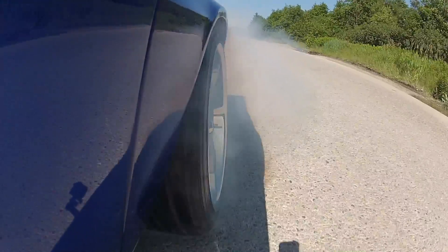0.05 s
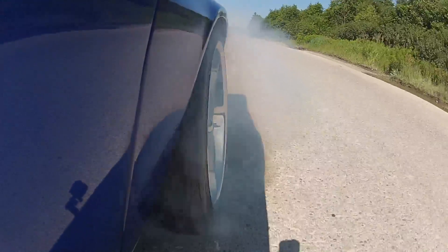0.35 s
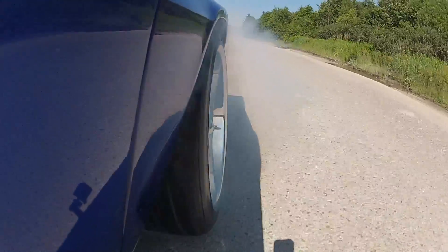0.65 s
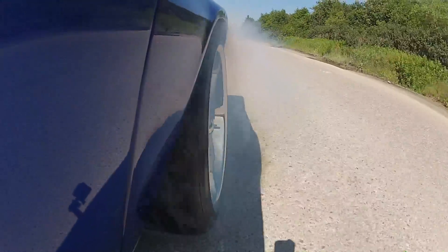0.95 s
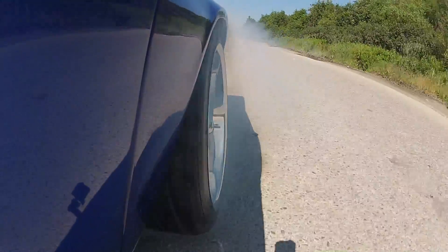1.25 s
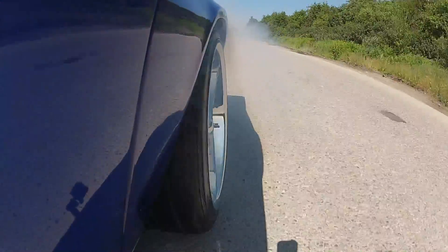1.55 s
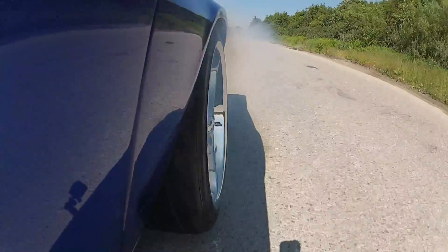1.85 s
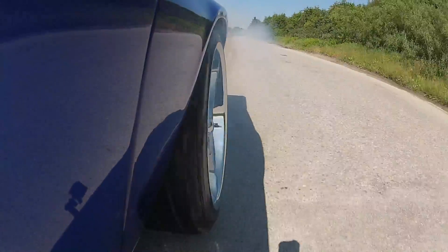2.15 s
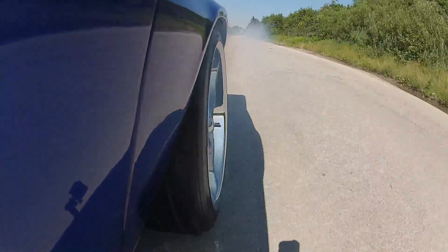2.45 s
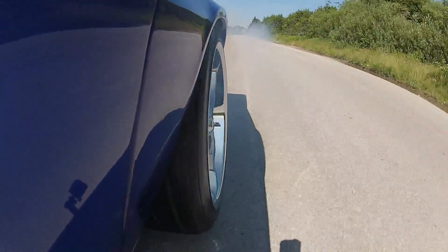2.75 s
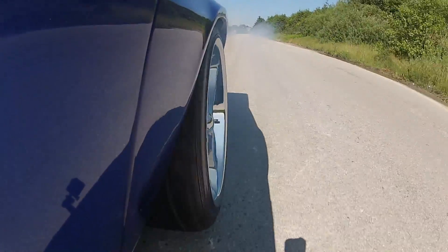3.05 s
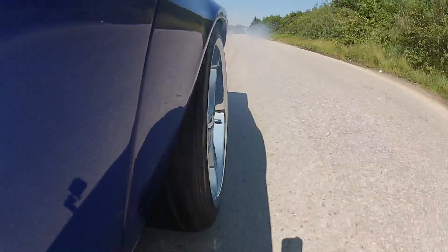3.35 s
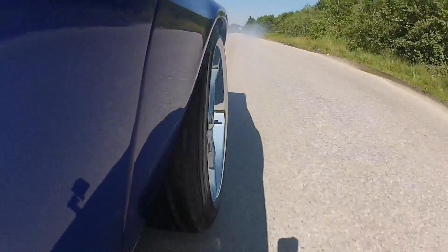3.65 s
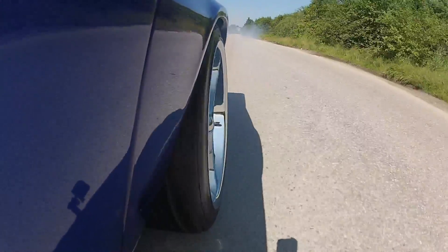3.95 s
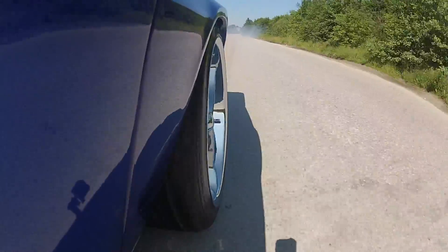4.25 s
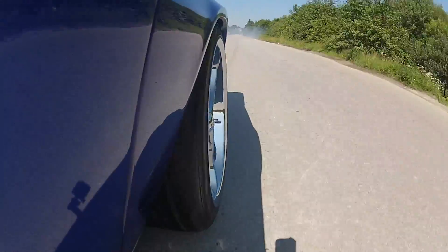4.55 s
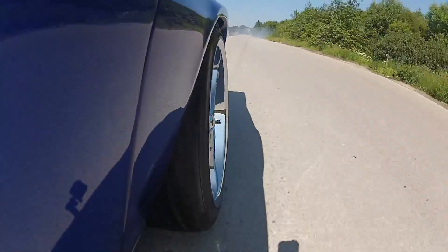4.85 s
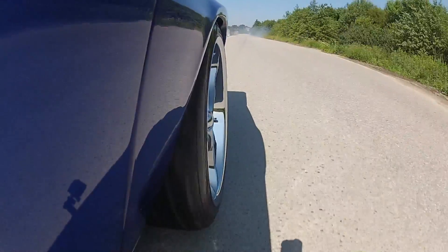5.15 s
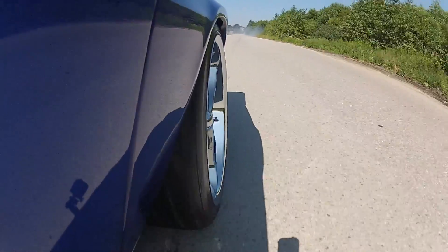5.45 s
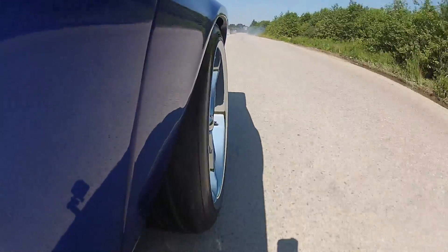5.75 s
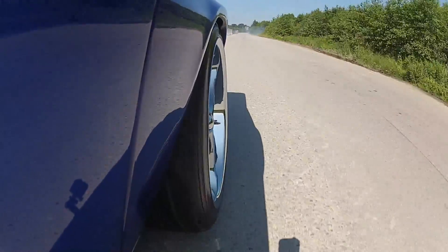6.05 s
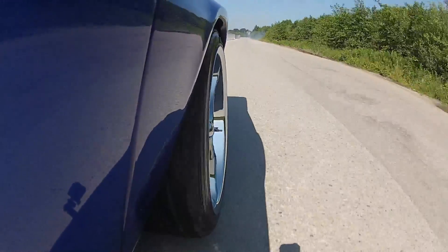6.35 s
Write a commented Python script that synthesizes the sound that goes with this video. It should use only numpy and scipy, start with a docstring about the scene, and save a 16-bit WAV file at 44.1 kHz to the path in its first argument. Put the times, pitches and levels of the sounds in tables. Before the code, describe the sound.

A car pulls away on a paved road, its loud exhaust roaring at steady high revs while a spinning rear tyre makes a gritty hiss. Wind gradually builds on a microphone fixed to the side of the car. After about four seconds the tyre grips, the revs sag and the engine labours as the wind rumble swells. The revs climb again, then the throttle closes near the end. A thin high whine runs throughout.

```python
"""A car pulls away on a paved road at high revs, exhaust roaring, a rear tyre spinning with a gritty hiss.
Wind builds on the microphone of a camera fixed to its side. After four seconds the tyre grips: the revs
sag, the engine labours and the wind swells. The revs climb again, and at six seconds the throttle closes.
Throughout, the camera rounds off the peaks and holds each sample at a low rate, which mirrors the engine
as a thin whine in the treble."""
import sys
import numpy as np
from scipy.fft import rfft, irfft, next_fast_len
from scipy.io import wavfile
from scipy.ndimage import map_coordinates

SR = 44100
rng = np.random.default_rng(int(sys.argv[2]) if len(sys.argv) > 2 else 0)


def inscribe(sig):
    """Save sig as 16-bit PCM at rate SR to the path in sys.argv[1].

    A 1-D sig is mono; a 2-D sig holds one channel per row.
    Samples are clipped to [-1, 1] before scaling.
    """
    pcm = np.round(np.clip(np.atleast_2d(sig).T, -1, 1) * 32767)
    wavfile.write(sys.argv[1], SR, pcm.astype(np.int16))


N = 282681


def amp(db):
    """Decibels to gain."""
    return 10 ** (np.asarray(db) / 20)


def unit(x):
    """Scale to rms 1."""
    return x / np.sqrt(np.mean(x ** 2) + 1e-20)


def curve(rows):
    """An automation line through (seconds, value) rows, one value per sample."""
    return np.interp(np.arange(N) / SR, *np.transpose(rows))


def wobble(rate):
    """Smooth random modulation with `rate` knots a second."""
    at = np.linspace(0, N * rate / SR, N // 32)
    knots = rng.standard_normal(int(at[-1]) + 4)
    coarse = map_coordinates(knots, [at + 1], mode="mirror")
    return np.interp(np.arange(N), np.linspace(0, N, len(at)), coarse)


def filtered(x, response):
    """Filter x by a gain given as a function of frequency."""
    size = next_fast_len(N + 8192)
    hz = np.fft.rfftfreq(size, 1 / SR)
    return irfft(rfft(x, size) * response(hz), size)[:N]


def coloured(x, spectrum):
    """EQ x through (Hz, dB) points on a log frequency axis, then scale to rms 1."""
    points_hz, points_db = np.transpose(spectrum)
    return unit(filtered(x, lambda hz: amp(np.interp(np.log(hz + 1), np.log(points_hz + 1), points_db))))


def noise(spectrum):
    """Noise of rms 1 with the given spectrum."""
    return coloured(rng.standard_normal(N), spectrum)


def low_pass(x, edge_hz, order):
    """Cut the highs, more steeply at higher orders."""
    return filtered(x, lambda hz: 1 / np.sqrt(1 + (hz / edge_hz) ** (2 * order)))


def soft_clip(x, top, hardness):
    """Peaks round off as they near the top."""
    return x / (1 + np.abs(x / top) ** hardness) ** (1 / hardness)


# Air rushing past the car: a slow build while the tyre spins, a fast one once it grips.
# Each row: time in seconds, relative level in dB.
AIRFLOW = [(0, -34.5), (2.3, -26), (3.9, -20.5), (4.5, -20), (4.75, -14), (5.2, -13), (5.45, -13.5),
           (5.95, -12.2), (6.3, -8.5)]


def airflow_db():
    """Airflow in dB relative to its peak; it stands for road speed."""
    flow_db = curve(AIRFLOW)
    return flow_db - flow_db.max()


# The revs. Each row: time in seconds, engine cycles per second.
REVS = [(0.0, 44.2), (0.64, 43.7), (1.28, 43.5), (2.02, 42.7), (2.89, 42.8), (3.41, 43.6), (3.82, 42.6),
        (4.12, 42.5), (4.23, 41.9), (4.44, 41.3), (5.12, 36.9), (5.39, 38.6), (5.53, 38.8), (5.62, 39.5),
        (5.94, 40.7), (6.07, 40.8), (6.23, 39.4), (6.41, 39.9)]
LABOURING_HZ, TOP_REVS_HZ = (40.2, 41.5), (42.8, 43.7)  # the exhaust's tone crossfades over these spans


def cycle_hz():
    """The engine's cycle rate: one cycle is two turns of the crank."""
    return curve(REVS)


# The colour of tyre hiss on the road. Each row: frequency in Hz, relative level in dB.
TYRE_HISS = [(500, -20), (1000, 3.5), (1450, 4), (2000, 5.5), (2450, 13), (2800, 9), (3100, 5), (3720, 8),
             (3970, 11), (4200, 6.5), (4600, 4), (5300, 3), (5800, -16.5)]


def tyre(grit_db):
    """Rubber scrubs the coarse road: gritty hiss with two metallic peaks, rising with spin and speed."""
    spin = amp(-36.5 + 0.1 * (cycle_hz() - TOP_REVS_HZ[1]))
    roll = amp(-33.5 + 0.57 * airflow_db())
    grit = amp(grit_db * wobble(500))
    flicker = amp(0.53 * wobble(12))
    return np.hypot(spin, roll) * flicker * unit(noise(TYRE_HISS) * grit)


# The rumble of wind on the microphone. Each row: frequency in Hz, relative level in dB.
WIND_RUMBLE = [(10, -34), (25, -10.5), (60, -2.5), (115, 0), (180, 0), (260, -2.5), (350, -9), (500, -12),
               (800, -22), (1300, -31), (3000, -51.5)]


def wind(lumps_db, crackle_db):
    """Eddies thump the microphone, harder as the car gathers speed; the strongest ones crackle."""
    swell = amp(curve(AIRFLOW) + 0.3)
    depth_db = lumps_db * (0.6 + 0.94 * amp(airflow_db()))  # faster air is lumpier
    eddies = amp(depth_db * wobble(32))
    thumps = unit(noise(WIND_RUMBLE) * eddies)
    crackle = coloured(rng.standard_normal(N) * thumps ** 2, TYRE_HISS)  # as bright as the tyre
    return swell * (thumps + amp(crackle_db) * crackle)


# The breath of turbulent gas leaving the pipe. Each row: frequency in Hz, relative level in dB.
GAS_BREATH = [(25, -28), (120, -22), (300, -9), (440, 1), (650, -6.5), (900, -5), (1100, -12),
              (1450, -20.5), (1800, -21), (2450, -37), (3100, -35), (5500, -30)]


def gas_puffs(angle, depth):
    """Gas rushes out of the pipe, pulsing with the four firings of each cycle."""
    firing = np.cos(4 * angle)
    return unit(noise(GAS_BREATH) * (1 + depth * firing))


# The bright edge of the firings. Each row: frequency in Hz, relative level in dB.
RASP_EQ = [(700, -30), (1000, -4), (1300, -3.5), (1480, -5), (1800, 1), (2100, 1.5), (2450, 2), (2780, .5),
           (3000, -10)]


def rasp(angle, scatter_db):
    """The upper partials of the firings, each swelling and fading on its own."""
    partials = np.zeros(N)
    for multiple in range(24, 72):
        swell = amp(scatter_db * np.tanh(wobble(0.915)))
        partials += swell * np.sin(multiple * angle + 2 * np.pi * rng.random())
    return coloured(partials, RASP_EQ)


def pipe_lag(multiple, dispersion, echo, echo_turn):
    """Phase lag in radians: the pipe and its echo delay each partial, smearing firings into a roar."""
    return dispersion * multiple ** 2 + echo * np.sin(2 * np.pi * echo_turn * multiple)


# The partials of the exhaust note. Each row: multiple of the cycle rate, then relative level in dB
# at top revs, a little below them, and when labouring.
EXHAUST_PARTIALS = [(2, -23, -23, -23), (3, -32, -32, -36), (4, -32, -31, -35), (5, -22, -22, -22),
                    (6, -25, -22, -20), (7, -44, -40, -39), (8, -16, -17, -17), (9, -25, -28, -27),
                    (10, -16, -17, -24), (11, -21, -21, -19), (12, -32, -26, -25), (13, -30, -32, -23),
                    (14, -31, -26, -33), (15, -41, -43, -34), (16, -37, -44, -32), (17, -31, -33, -34),
                    (18, -41, -33, -29), (19, -38, -37, -28), (20, -35, -34, -41), (21, -30, -28, -38),
                    (22, -47, -39, -39), (23, -50, -44, -38), (29, -45, -51, -39.5), (31, -47, -47, -57),
                    (39, -54, -49, -52), (43, -57, -48, -59)]


def exhaust(speed_hz, angle, wander_db, flutter, labour_flutter):
    """Unequal cylinders sound multiples of the cycle rate, in a balance that shifts with the revs."""
    top = np.interp(speed_hz, TOP_REVS_HZ, [0, 1])
    labour = np.interp(speed_hz, LABOURING_HZ, [1, 0])
    middle = 1 - top - labour
    unsteady = flutter + labour_flutter * labour  # a labouring engine burns less evenly
    note = np.zeros(N)
    for multiple, top_db, middle_db, labour_db in EXHAUST_PARTIALS:
        level = top * amp(top_db) + middle * amp(middle_db) + labour * amp(labour_db)
        wander = amp(wander_db * wobble(2.93))
        tremble = 1 + unsteady * wobble(18)
        lag = pipe_lag(multiple, dispersion=0.57, echo=-1.22, echo_turn=0.244)
        phase = multiple * angle - lag + unsteady * wobble(22)
        note += level * wander * tremble * np.sin(phase)
    return note


def throttle_db(open_db, lift_s, fall_s, drop_db):
    """The engine's gain: wide open, then a quick fall as the driver lifts off."""
    return open_db + curve([(lift_s, 0), (lift_s + fall_s, -drop_db)])


def engine():
    """Exhaust note, rasp and puffs of gas all follow the crank and the throttle."""
    speed_hz = cycle_hz()
    angle = 2 * np.pi * np.cumsum(speed_hz) / SR
    angle += 0.0044 * wobble(40)  # no two cycles last quite as long
    note = amp(1.46) * exhaust(speed_hz, angle, wander_db=0.5, flutter=0.019, labour_flutter=0.14)
    rasp_gain = amp(-36 + 0.18 * airflow_db())  # road speed loads the engine
    buzz = rasp_gain * rasp(angle, scatter_db=7.0)
    gas = amp(-28.5) * gas_puffs(angle, depth=0.28)
    drive_db = throttle_db(open_db=1.82, lift_s=6.07, fall_s=0.068, drop_db=6)
    flicker_db = 0.14 * wobble(40)
    return amp(drive_db + flicker_db) * (note + buzz + gas)


def scene():
    """Engine, tyre and wind reach one microphone, which feeds both channels."""
    mix = engine() + tyre(grit_db=1.0) + wind(lumps_db=3.5, crackle_db=-26.5)
    return np.array([mix, mix])


def record(dry):
    """The camera saturates, keeps a narrow band and holds each sample, mirroring it into the treble."""
    hold_hz = 12000
    rounded = soft_clip(dry[0], top=0.95, hardness=12)
    band = low_pass(rounded, edge_hz=5680, order=50)
    carrier = np.cos(2 * np.pi * hold_hz * np.arange(N) / SR)
    mirrored = band * (1 + 2.19 * carrier)  # images on either side of the hold rate
    held = filtered(mirrored, lambda hz: np.sinc(hz / hold_hz))  # holding thins them to a whine
    sway = amp(-43.0) * wobble(300)  # the stereo balance trembles very slightly
    return np.array([low_pass(held * (1 + side * sway), edge_hz=15150, order=120) for side in (1, -1)])


dry = scene()
out = record(dry)
inscribe(out)
```